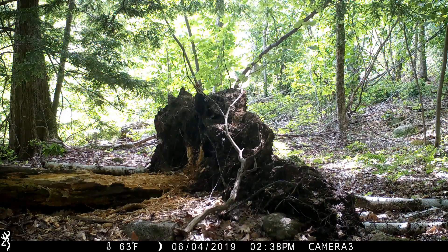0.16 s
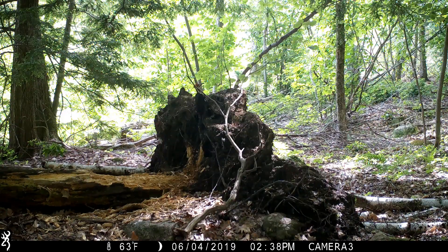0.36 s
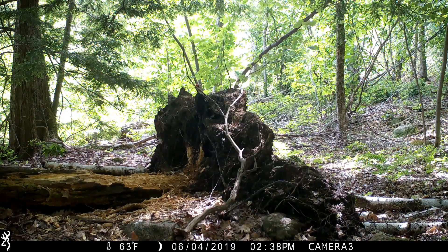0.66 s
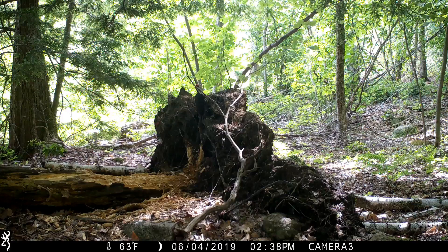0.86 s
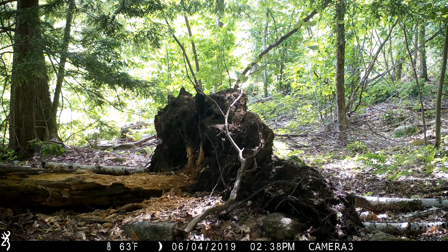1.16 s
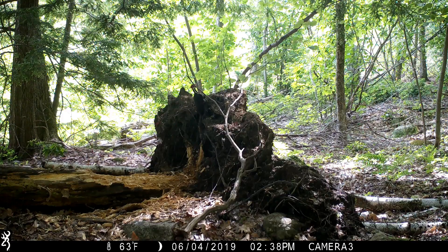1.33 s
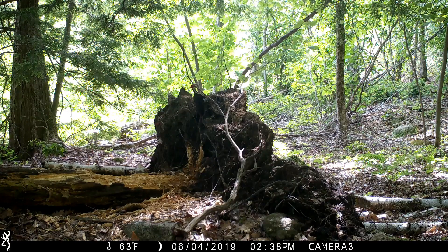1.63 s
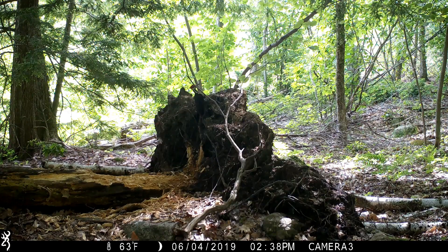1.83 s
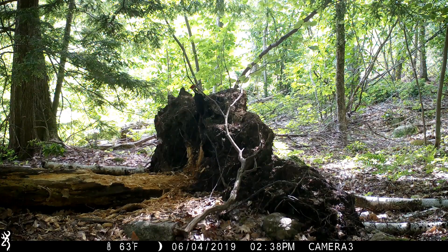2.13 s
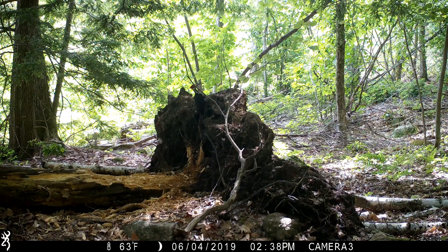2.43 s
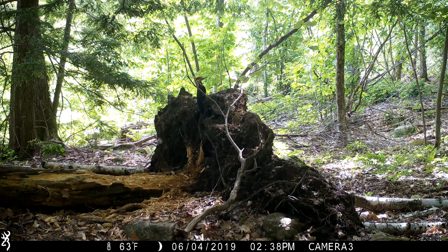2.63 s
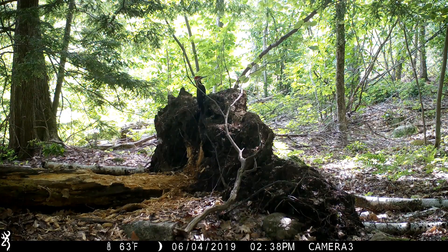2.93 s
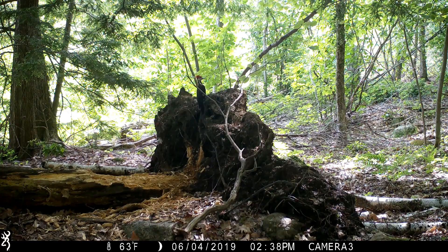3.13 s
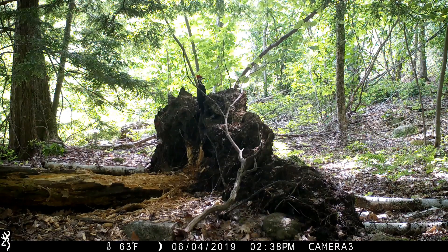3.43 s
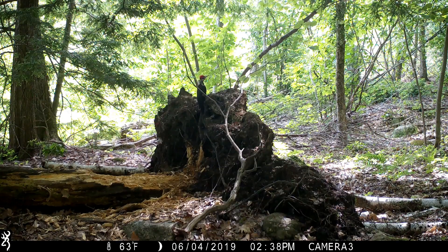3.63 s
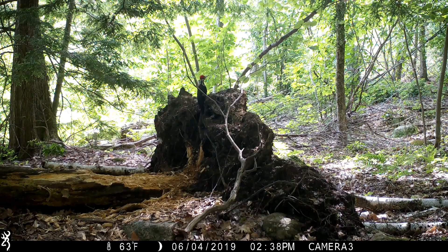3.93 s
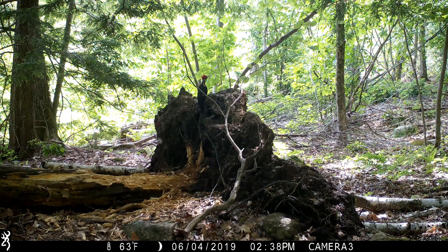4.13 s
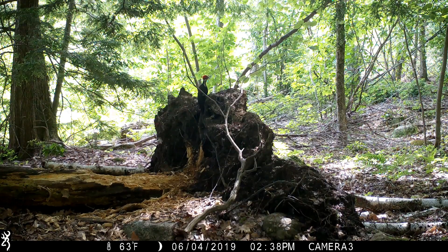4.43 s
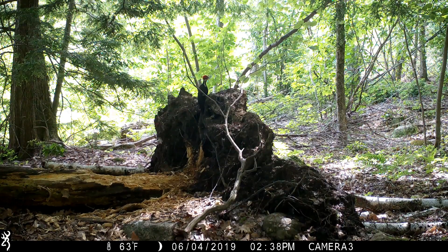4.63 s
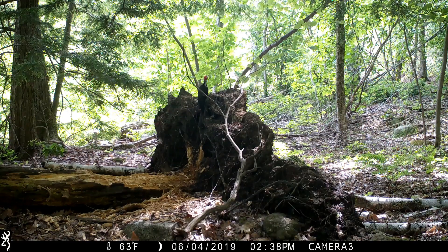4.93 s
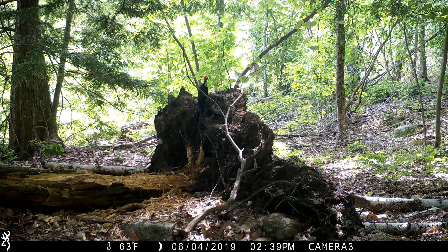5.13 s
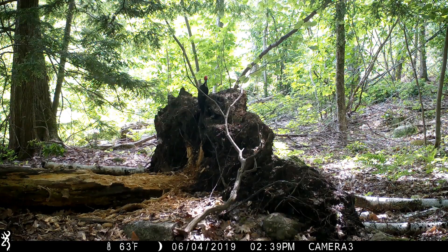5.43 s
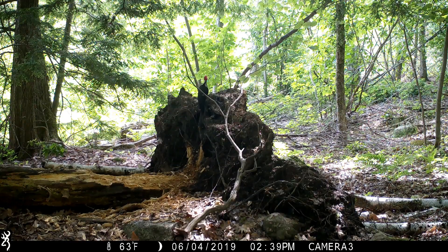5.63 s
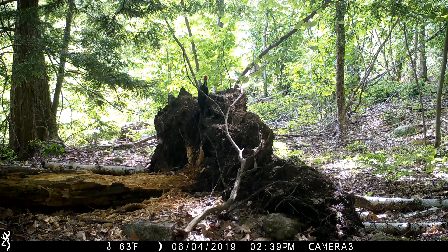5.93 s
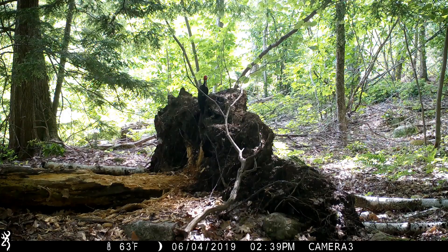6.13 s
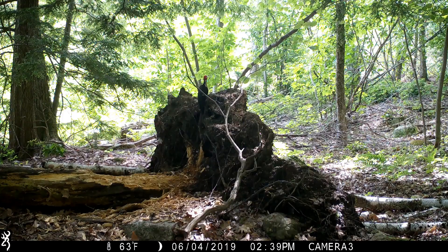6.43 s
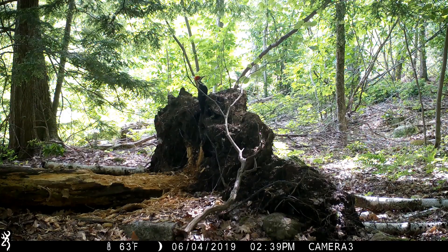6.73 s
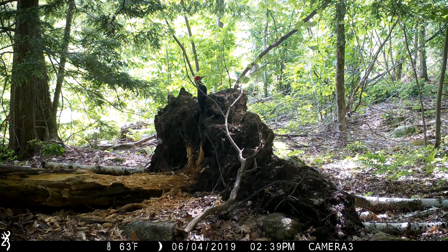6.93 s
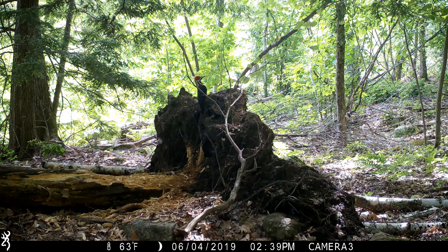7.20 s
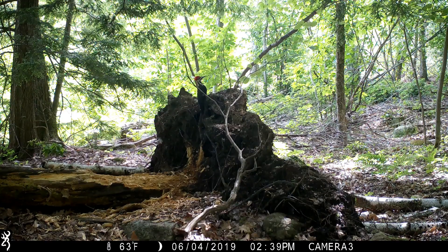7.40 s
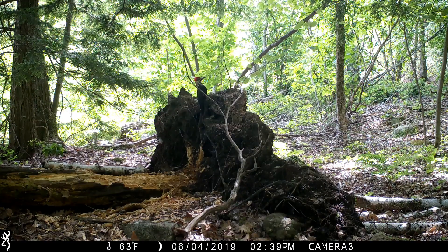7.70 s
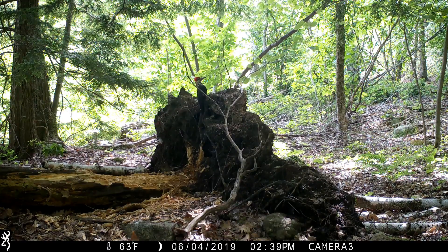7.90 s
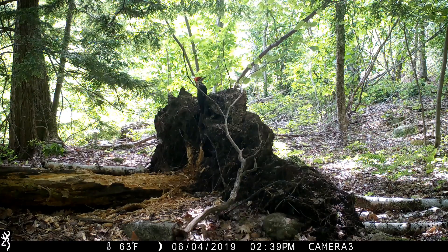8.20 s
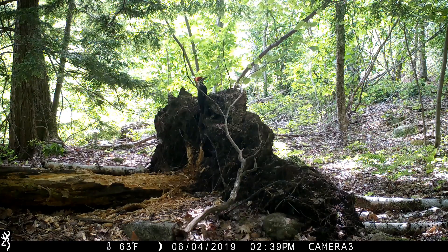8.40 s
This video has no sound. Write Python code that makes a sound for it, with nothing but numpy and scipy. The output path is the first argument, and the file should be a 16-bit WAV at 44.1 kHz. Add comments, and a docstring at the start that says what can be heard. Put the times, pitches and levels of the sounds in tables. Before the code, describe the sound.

Quiet woodland hush with low microphone rumble and faint, gliding songbird chirps in the distance, plus a tiny twig tick. After three seconds a large woodpecker close by starts calling: a first note, a short gap, then sharp yelping notes repeated evenly five to six times a second until the end. Trunks return a short, scattered echo. The sound is coarse and slightly metallic, from a cheap outdoor camera.

```python
"""Woodpecker calling in the woods

A large woodpecker on a root stump gives a long series of even, ringing notes, built from harmonics.
Trunks and ground throw them back as a few echoes and a spray of scattered sound. Below lie a far
songbird of gliding whistles, two twig ticks of ringing wood, and the hush of the woods as coloured noise.
A cheap camera samples the sound 8000 times a second and joins the samples by straight lines."""
import sys
import numpy as np
from scipy import signal
from scipy.fft import rfft, irfft
from scipy.io import wavfile
from scipy.ndimage import uniform_filter1d, map_coordinates

SR = 44100
rng = np.random.default_rng(int(sys.argv[2]) if len(sys.argv) > 2 else 0)


def put_to_file(sound):
    """Save the sound as 16-bit audio at rate SR, in the file named by the first command-line argument."""
    columns = np.atleast_2d(sound).T  # one column per channel
    safe = np.clip(columns, -1, 1)
    whole_steps = np.round(safe * 32767)
    wavfile.write(sys.argv[1], SR, whole_steps.astype(np.int16))


N = 377496
SAMPLE_HZ = 8000   # the camera's sampling rate


def from_db(db):
    """Turn decibels into a gain."""
    return 10 ** (np.asarray(db) / 20)


def rms_one(x):
    """Scale a signal to an rms (average strength) of 1."""
    return x / np.sqrt(np.mean(x ** 2))


def at_hz(points, hz):
    """Read a level curve between its points, with frequency on a log axis."""
    point_hz, point_db = np.array(points)[:, 0], np.array(points)[:, 1]
    return np.interp(np.log(hz), np.log(point_hz), point_db)


def flutter(size, rate_hz):
    """Slow random wandering: noise twice through a one-pole low-pass, scaled to rms 1."""
    r = np.exp(-2 * np.pi * rate_hz / SR)
    noise = rng.standard_normal(size + 999)
    settled = signal.lfilter([1], [1, -2 * r, r * r], noise)[999:]   # skip the filter's start
    return rms_one(settled)


def hush():
    """Steady noise of leaves, air and the microphone, ending at half the sampling rate."""
    # colour of the hush, before its overall level is set: f/Hz, level/dB per Hz
    hush_colour = [(12, -30), (20, -5), (49, -1), (180, -5.5), (320, -7), (357, -7.5), (456, -9),
                   (594, -10), (1480, -15.5), (2510, -17), (3740, -17), (4000, -22), (5200, -66),
                   (8800, -120)]
    level_db, drift_db, drift_hz = -45, .5, 3.0
    hz = np.fft.rfftfreq(N, 1 / SR)[1:]
    colour = from_db(at_hz(hush_colour, hz)) * (hz < SAMPLE_HZ / 2)
    spectrum = rfft(rng.standard_normal(N)) * np.r_[0, colour]
    noise = rms_one(irfft(spectrum, N))
    return from_db(level_db + drift_db * flutter(N, drift_hz)) * noise


def songbird():
    """Short gliding sines with soft ends; some are clear, some buzz and waver."""
    # far whistles: t/s, length/s, start f/Hz, middle f/Hz, end f/Hz, level/dB,
    # level change over the whistle/dB, waver (0 to 1)
    whistles = [(.33, .06, 3400, 3080, 3150, -50, -8, 0.84), (.415, .02, 3900, 3960, 3900, -53, -2.5, .3),
                (0.484, 0.059, 2970, 2800, 2750, -46.5, -5, .5), (.55, 0.11, 3960, 3410, 3370, -49, -8, .3),
                (.56, 0.065, 2700, 3120, 3180, -50, -9, .3), (1.413, .05, 3490, 3750, 3480, -51, 1, .9),
                (1.832, .023, 2950, 2780, 2600, -50, -1.5, .05),
                (1.865, .032, 3240, 3460, 3670, -49.5, 4, 0),
                (1.911, 0.051, 3600, 3030, 2600, -48, 5, 0.06),
                (1.982, .018, 2800, 2650, 2560, -45, -.1, .05),
                (2.094, 0.048, 3030, 2610, 2600, -40.5, -9, 0.06),
                (2.149, .035, 3700, 3820, 3610, -52, 4, 0.1),
                (2.158, 0.021, 2640, 2920, 3230, -44, 1.5, .05),
                (2.175, .043, 3240, 2400, 2200, -43, -12, .05),
                (3.385, .03, 3050, 2860, 2650, -54, 1.5, .15),
                (3.718, 0.044, 3360, 3250, 3300, -47.5, -7, .15),
                (3.735, .045, 2950, 2950, 2950, -46, -4, .15),
                (4.644, .06, 3783, 3700, 3554, -51, -.1, .15), (4.815, .05, 2570, 2660, 2760, -51, 5, .15),
                (4.907, 0.028, 3020, 3020, 3020, -52, 0, .15), (6.24, .03, 3176, 2910, 2650, -44, 3, .15)]
    steady_waver_db, full_waver_db = 1.5, 3.5   # level spread at waver 0, and what waver 1 adds
    full_waver_pitch = .065   # pitch spread at waver 1, as a share
    out = np.zeros(N)
    bend, flicker = flutter(N, 60), flutter(N, 90)
    for s, length, *glide_hz, level_db, fade_db, waver in whistles:
        along = np.linspace(0, 1, round(length * SR))
        start = round(s * SR)
        span = slice(start, start + len(along))
        glide = np.interp(along, [0, .5, 1], glide_hz)
        hz = glide * (1 + full_waver_pitch * waver * bend[span])
        spread_db = steady_waver_db + full_waver_db * waver
        loud_db = level_db + fade_db * along + spread_db * flicker[span]
        soft_ends = signal.windows.tukey(len(along), .4)
        out[span] += from_db(loud_db) * soft_ends * np.sin(2 * np.pi * np.cumsum(hz) / SR)
    return out


def twigs():
    """Each tick rings a few short modes (natural tones) of wood."""
    # ticks: t/s, level/dB
    ticks = [(1.1862, -39.5), (2.9148, -36)]
    # tones of the wood: f/Hz, level/dB, time to fall by 60 dB/s
    wood_modes = [(3900, -1, .02), (3500, -5, .012), (3000, -6, .01)]
    out, t = np.zeros(N), np.arange(SR // 20) / SR
    ring = np.zeros(len(t))
    for hz, level_db, t60 in wood_modes:
        ring += from_db(level_db - 60 * t / t60) * np.sin(2 * np.pi * hz * t)
    for s, tick_db in ticks:
        out[round(s * SR):][:len(t)] += from_db(tick_db) * ring
    return out


def woodpecker():
    """Each note is a stack of harmonics whose pitch arches through the fixed colour of the throat."""
    # notes: t of the jump up in pitch/s, lead-in/s, crown/s, reference pitch near the top f/Hz, level/dB
    notes = [(3.127, 0.012, 0.037, 1052, 3), (3.438, .0096, 0.036, 988, 0), (3.649, .016, .032, 982, 1.5),
             (3.848, .016, 0.032, 981, 1.5), (4.031, 0.017, 0.029, 981, 1.8),
             (4.215, .016, .0292, 977, 0.7), (4.399, .017, 0.029, 987, 0.6), (4.581, .016, .029, 989, 0.4),
             (4.77, .016, 0.03, 990.4, 0.3), (4.953, .017, 0.027, 994, 0.9), (5.134, .018, 0.029, 989, 0.7),
             (5.308, 0.018, 0.026, 996, 1.1), (5.479, 0.02, 0.027, 999, 1.1), (5.653, .02, 0.028, 998, 0.5),
             (5.827, 0.02, .026, 992, 1.1), (6.011, 0.02, .0278, 994, 0.2), (6.187, 0.02, 0.027, 990, 0.9),
             (6.369, 0.019, 0.028, 981, 1.2), (6.545, .019, .027, 989, 0.8), (6.712, .019, 0.027, 993, 1.7),
             (6.882, .016, .028, 987, 1.5), (7.052, 0.016, 0.029, 981, 1.2), (7.225, .018, 0.027, 979, 1.8),
             (7.399, .016, 0.028, 970, 1.5), (7.568, .018, 0.028, 986, 1.5), (7.74, .016, 0.029, 978, .6),
             (7.915, 0.015, 0.031, 969, 0.6), (8.093, 0.017, .027, 971, 1), (8.267, .02, 0.026, 996, 2.5),
             (8.45, .017, 0.027, 970, 1)]
    # course of one note: place (-1 to 0 lead-in, 0 to 1 crown, then the fall),
    # pitch (share of the reference), effort level/dB, fundamental level/dB
    note_shape = [(-1.15, .63, -34.5, -10), (-.75, .69, -3, -8.5), (-.1, .81, -2, -2), (.1, .975, -5, 6.5),
                  (0.292, 1.001, -1.1, 2.5), (0.545, 1.007, 0.64, -0.35), (.78, .963, 1.1, -2.5),
                  (1.0, .88, 1.1, -2.5), (1.2, .812, -0.24, -20), (1.35, 0.753, 2.5, -11.5),
                  (1.45, 0.6, -12, -7), (1.625, 0.65, -38, -13)]
    # source strength of harmonics 1 to 6: level/dB
    harmonics_db = [-21.5, -18, -30.5, -36, -42, -49.5]
    # colour of throat and beak: f/Hz, level/dB
    throat = [(600, -9.5), (800, -5.5), (950, 1), (1380, -5), (1600, 2), (1780, -6.5), (1950, -1.5),
              (2150, -2), (2330, -9.5), (2550, -0.5), (2950, -10.5), (3200, -5.5), (3600, 4), (4200, 1),
              (5000, -22), (6500, -23)]
    # the head turns, so more or less treble reaches the microphone:
    # t/s, third harmonic level/dB, higher harmonics level/dB
    facing = [(3.1, 2, -1), (3.6, 2, 4), (4.4, -0.5, 1), (5.2, 0, 1), (6.2, 2, -0.4), (7.3, -.3, -1.7),
              (8.501, -.3, -0.2)]

    breathy_db = -28.5   # noise on the fundamental; it grows with the harmonic number
    wobble_share = .0028   # fast unsteadiness of pitch
    uneven_db = 1.5   # chance spread of the third and higher harmonics from note to note
    full_lead_s, skip_per_s = .018, 7.17   # shorter lead-ins run higher in pitch, longer ones lower
    # the bird warms up: the first notes are duller, then settle
    warm_up_s, beak_warm_up_s = .62, 1.02   # the beak takes longer to open freely
    overtones_db, cold_overtones_db = 3.5, -11   # when settled, change when cold
    closed_beak_db, cold_closed_beak_db = .95, -9   # likewise, until the beak is open
    cold_onset_db = -4   # cold notes swell slowly: change of the fundamental until mid-crown
    upper_db, upper_fade_db = 7, -14   # fourth harmonic up: at the jump, change across the crown
    upper_lead_db, upper_fall_db = 2, -1.5   # the same harmonics in the lead-in and in the fall
    third_follows = .32   # the third harmonic takes this share of those swings

    out = np.zeros(N)
    place, share, effort_db, first_db = np.transpose(note_shape)
    crown_db = upper_db + upper_fade_db * place
    swing_db = np.select([place < 0, place > 1], [upper_lead_db, upper_fall_db], crown_db)
    source_db = np.array(harmonics_db)[:, None]
    order = np.arange(1, len(harmonics_db) + 1)[:, None]
    when, *facing_db = np.transpose(facing)
    wobble, breath = flutter(N, 120), flutter(N, 230)
    for s, lead, crown, top_hz, level_db in notes:
        cold, stiff = np.exp((notes[0][0] - s) / np.array([warm_up_s, beak_warm_up_s]))
        knots = place * np.where(place < 0, lead, crown)
        t = np.arange(knots[0], knots[-1], 1 / SR)
        start = round((s + knots[0]) * SR)
        span = slice(start, start + len(t))

        def smooth(column):
            """Follow one column along the note, with rounded corners."""
            return uniform_filter1d(np.interp(t, knots, column), size=90, mode="nearest")

        in_lead = (place < 0) * (place > -1)
        arch = smooth(share + skip_per_s * (full_lead_s - lead) * in_lead)
        hz = top_hz * arch * (1 + wobble_share * wobble[span])

        # levels of the overtones, then of the fundamental
        third_db, higher_db = (np.interp(s, when, column) for column in facing_db)
        closed = smooth(np.clip(1 - 2 * place, 0, 1))   # 1 = shut, 0 = open from mid-crown
        beak_db = overtones_db + cold_overtones_db * cold
        beak_db = beak_db + (closed_beak_db + cold_closed_beak_db * stiff) * closed
        beak_db = beak_db + uneven_db * rng.standard_normal(order.shape) * (order > 2)
        beak_db += (order == 3) * (third_db + third_follows * smooth(swing_db))
        beak_db += (order > 3) * (higher_db + smooth(swing_db))
        fundamental_db = smooth(first_db) + cold_onset_db * cold * closed
        extra_db = np.where(order == 1, fundamental_db, beak_db)

        gain = from_db(source_db + at_hz(throat, order * hz) + extra_db)
        gain = gain * (1 + from_db(breathy_db) * order * breath[span])
        turns = order * np.cumsum(hz) / SR + rng.random(order.shape)
        swell = from_db(level_db + smooth(effort_db)) * signal.windows.tukey(len(t), .25)
        out[span] += swell * np.sum(gain * np.sin(2 * np.pi * turns), axis=0)
    return out


def scattering():
    """The reply of many trunks and leaves to one click, without the direct sound."""
    # scattered sound, near and far: level/dB, time to fall by 60 dB/s
    scatter_parts = [(-13.5, 0.12), (-18, 0.59)]
    # colour of the scattered sound: f/Hz, level/dB
    leaf_colour = [(500, -3), (1000, -2.5), (1550, -3), (1750, 5.5), (1980, 1), (2600, 2.5), (3300, 7.5),
                   (4000, 5.5)]
    t, answer = np.arange(SR) / SR, np.zeros(SR)
    for level_db, t60 in scatter_parts:
        clumps = from_db(3.75 * flutter(SR, 67))   # uneven clumps of reflectors
        trunks = rng.standard_normal(SR) * clumps
        build_up = 1 - np.exp(-t / .008)
        scatter = trunks * from_db(-60 * t / t60) * build_up
        answer += from_db(level_db) * scatter / np.sqrt(np.sum(scatter ** 2))
    hz = np.arange(SR // 2 + 1) + 1   # one step per Hz, shifted by 1 to avoid log of zero
    return irfft(rfft(answer) * from_db(at_hz(leaf_colour, hz)), SR)


def woods(near, far):
    """Direct sound, a few clear echoes, and scattering whose pattern shifts as birds and leaves move."""
    # echoes of the near sounds from ground and near trunks: delay/s, level/dB
    echoes = [(.0035, -22.5), (.012, -20.5), (.024, -20.5)]
    far_wet_db = 7   # the far bird comes with more scattered sound
    out = near + far
    for late, level_db in echoes:
        delay = round(late * SR)
        out[delay:] += from_db(level_db) * near[:-delay]
    send = near + from_db(far_wet_db) * far
    shift_hz = .8 + .5 * flutter(N, 2.62)
    blend = 2 * np.pi * np.cumsum(shift_hz) / SR
    # drift back and forth between two scattering patterns
    for weight in np.sin(blend), np.cos(blend):
        out += signal.fftconvolve(send * weight, scattering())[:N]
    return out


def scene():
    """Near bird, far bird and twigs sound in the same woods, over the hush."""
    near = woodpecker() + twigs()
    return (woods(near, songbird()) + hush())[None]


def record(dry):
    """Coarse samples joined by straight lines mirror the sound around multiples of 8 kHz; the top is cut."""
    cutoff_hz = 15750
    taken = np.arange(0, N, SR / SAMPLE_HZ)
    samples = map_coordinates(dry[0], [taken], order=3, mode="nearest")
    joined = np.interp(np.arange(N), taken, samples)
    top_cut = signal.ellip(12, .3, 70, cutoff_hz, fs=SR, output="sos")
    return signal.sosfilt(top_cut, joined)[None]


dry = scene()
out = record(dry)
put_to_file(out)
```